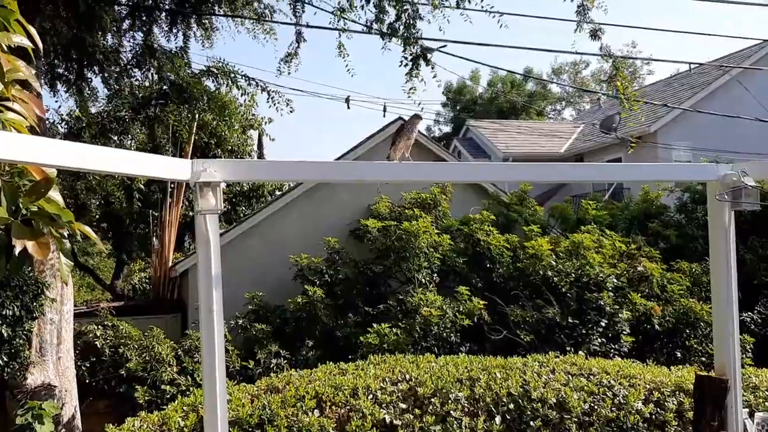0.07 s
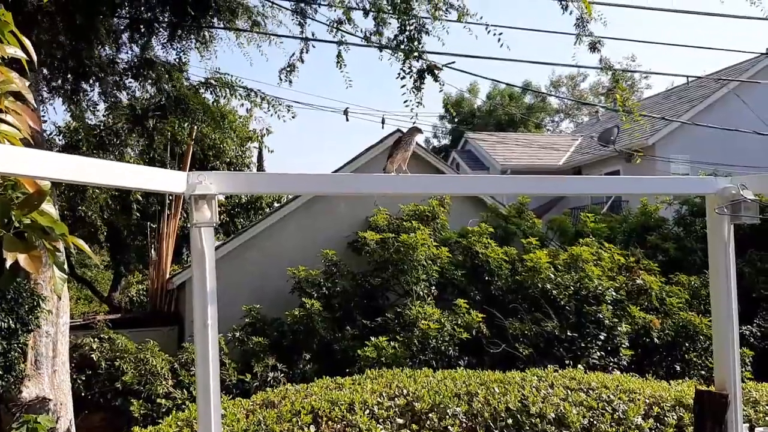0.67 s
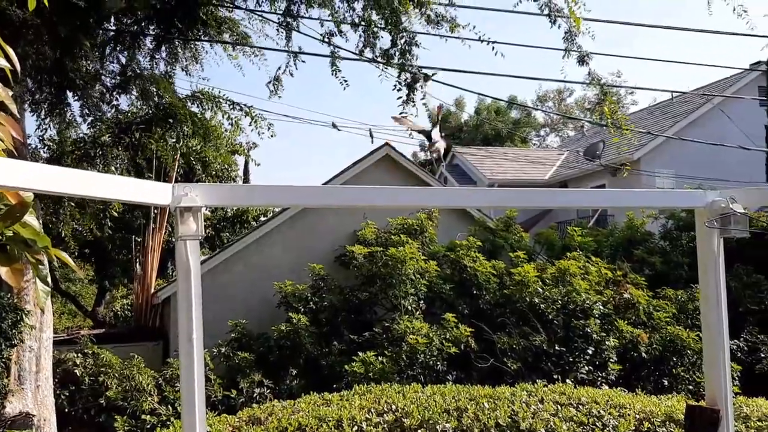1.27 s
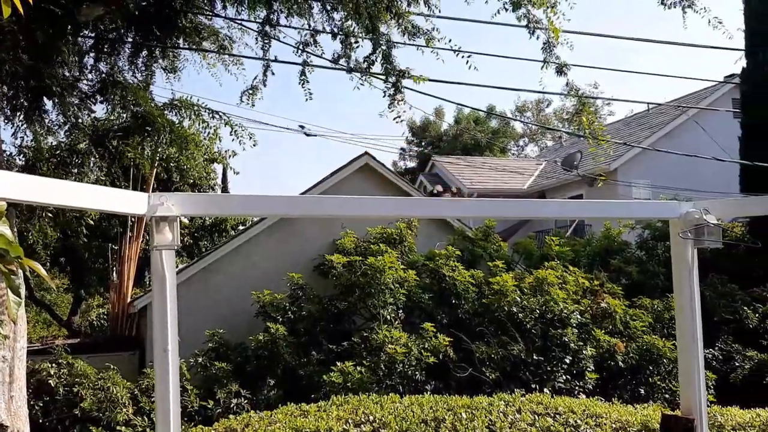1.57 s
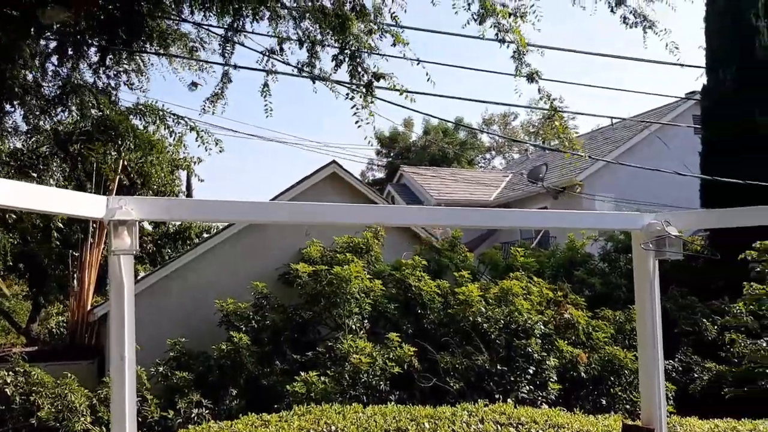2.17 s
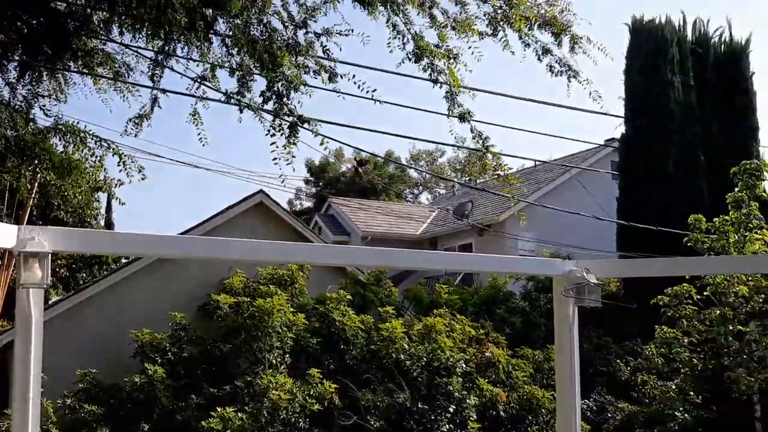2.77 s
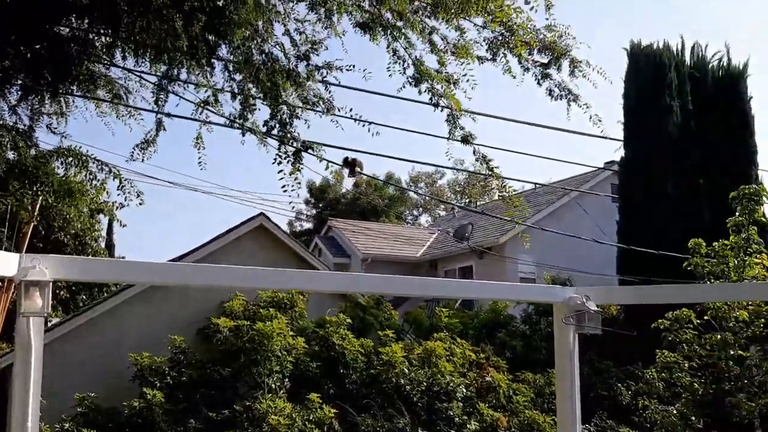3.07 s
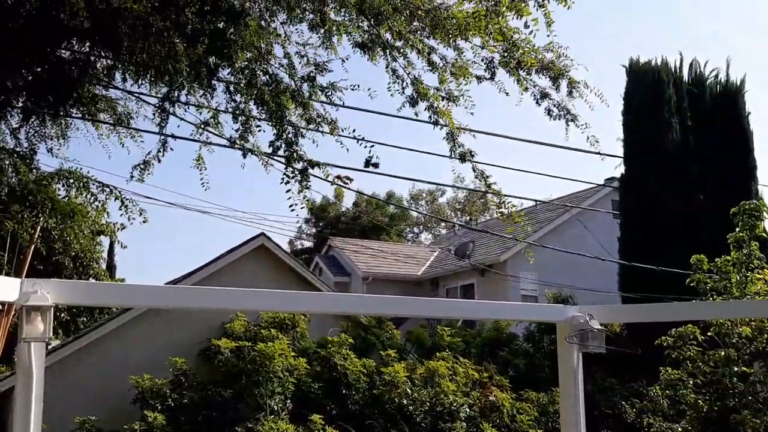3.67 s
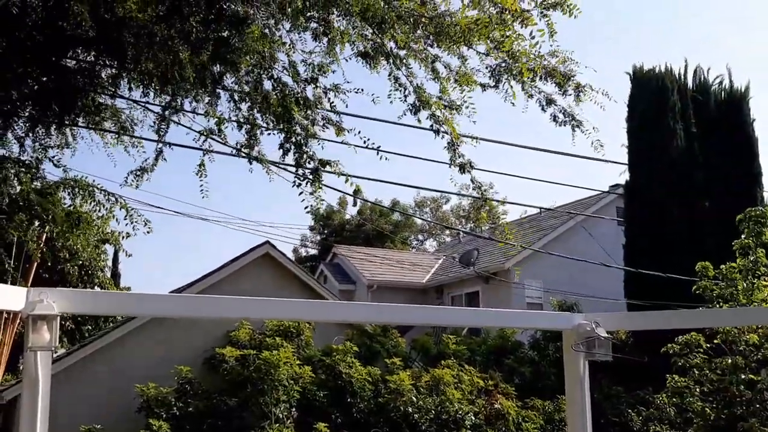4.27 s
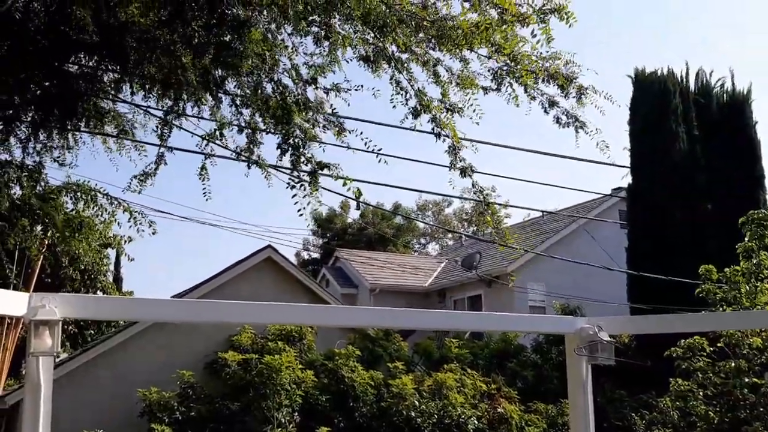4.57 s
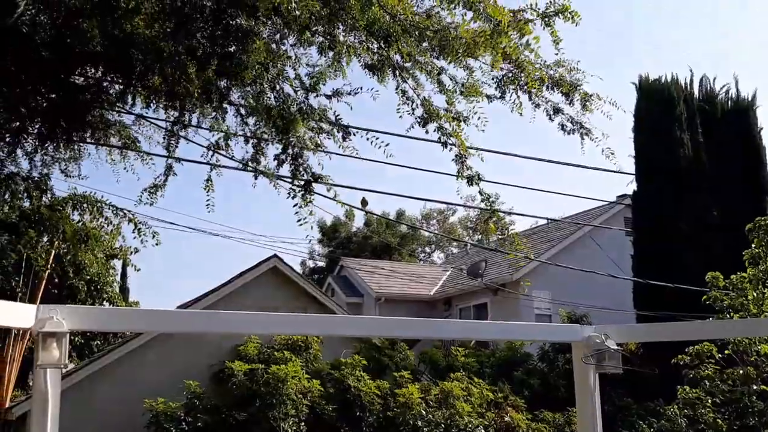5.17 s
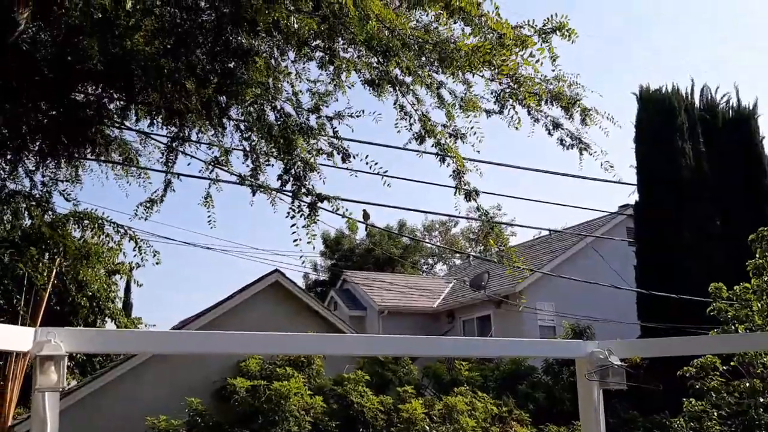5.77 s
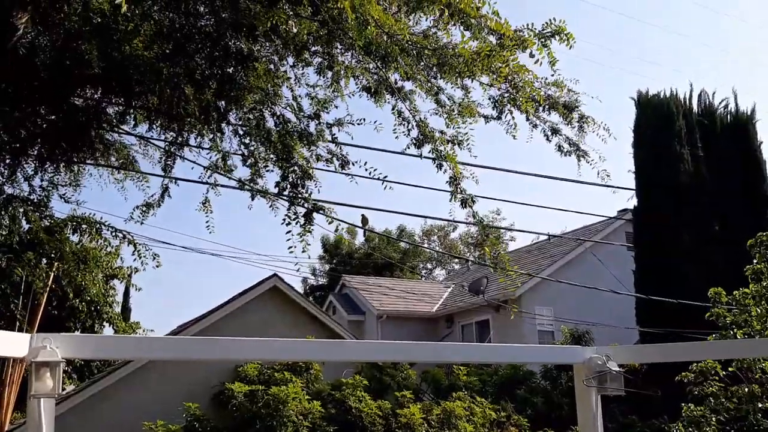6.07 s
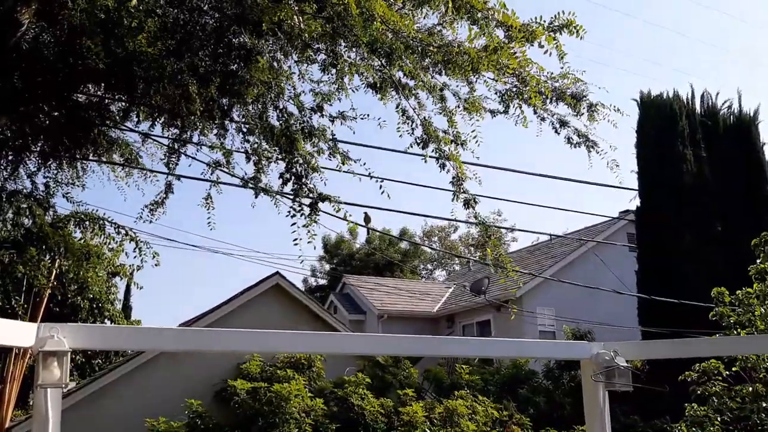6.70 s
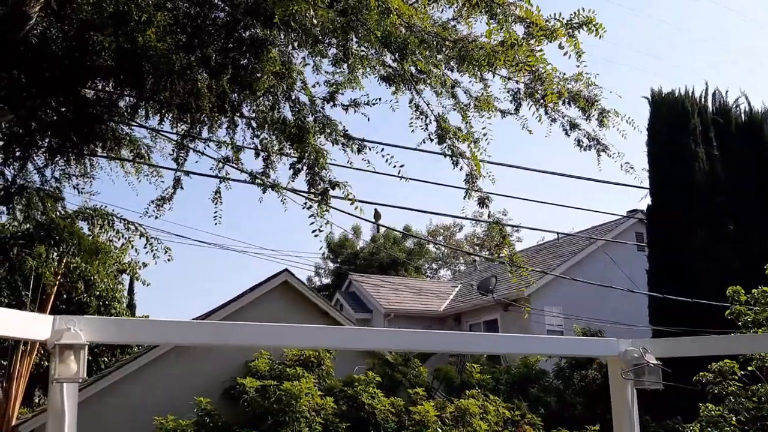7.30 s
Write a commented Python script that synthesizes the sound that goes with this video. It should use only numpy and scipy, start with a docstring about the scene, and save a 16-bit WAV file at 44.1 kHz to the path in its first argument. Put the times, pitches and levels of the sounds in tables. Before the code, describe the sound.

Small birds scold a hawk in a suburban backyard, their calls echoing briefly off house walls over a faint hush and low rumble. Long hissing rasps, thin squeals and cracking yelps fill the first half second, with a soft wing whoosh. Near 0.9 seconds come another whoosh, a slight rustle and hoarse arched chirps. From 1.3 to 2.2 seconds a quick run of rough, high chacks is the loudest part, ending in a chirp. Two more chacks and a squealing rasp follow between 2.5 and 3 seconds. Then it thins to single chirps, faint ticks near 3.6, and lone chacks at 4.1 and 4.6. Rasps return at 4.7 and from 5.6 on, mixed with squeals and lower yelps, growing weaker until about 7.3 seconds. Soft low bumps nudge the hand-held microphone, mostly on the left, at 1.1 seconds and repeatedly from 4 to 7.

```python
"""Songbirds mobbing a hawk in a back yard.

Air forced through the syrinx gives long hissing rasps, squeals, short rough chacks, arched chirps
and cracking yelps. House walls and hedges throw the calls back. Wings whoosh, and soft low bumps
shake the hand-held camera over a faint suburban rumble."""
import sys
import numpy as np
from scipy import signal
from scipy.fft import rfft, irfft, next_fast_len
from scipy.io import wavfile
from scipy.ndimage import map_coordinates

SR = 44100
rng = np.random.default_rng(int(sys.argv[2]) if len(sys.argv) > 2 else 0)


def file_out(sig):
    """Save sig as 16-bit WAV at sys.argv[1]."""
    # one column per channel
    cols = np.atleast_2d(sig).T
    # limit, then scale
    lim = np.clip(cols, -1, 1)
    pcm = np.round(lim * 32767).astype(np.int16)
    wavfile.write(sys.argv[1], SR, pcm)


N = 323694
T = np.arange(N) / SR


def chacks(pulse_hz=165, swing_hz=190, rough_db=8, attack_s=.02, release_s=.035, throat_width_hz=1350):
    """A whistle torn into uneven pulses that jerk pitch and loudness, focused by a throat tuned to it."""
    # Each row: start in seconds, length in seconds, level in dB, pitch in Hz, slide in Hz,
    # left over right in dB.
    calls = [(-.04, 0.079, -33, 3340, 80.5, 3.5), (1.302, 0.13, -26, 3432, -450, -1.5),
             (1.489, 0.096, -25, 3627, 397.5, 1.5), (1.643, .14, -24, 3583, 347.5, 0),
             (1.812, 0.12, -25, 3300, -370, 2), (1.883, .12, -22, 3734, 140.5, 2.5),
             (1.996, 0.077, -30.5, 3420, -250, -0.5), (2.058, .12, -25, 3473, 130, -1),
             (2.458, .14, -28, 3443, -320, 1.5), (2.64, .1, -26, 3747, 261.5, -4),
             (4.111, .12, -29, 3380, -130, 1), (4.587, .12, -30, 3270, -380, 2.5)]
    # Turbulence spectrum. Each row: frequency in Hz, density in dB.
    edge_spectrum = [(800, -13), (1800, -8.5), (2900, 7), (4200, 5.5), (5000, -2), (6400, -7), (7600, -23),
                     (10000, -10), (11700, -6.5), (13500, -13.5), (15500, -16)]
    # Upper throat resonance, rising as the beak opens: early, late.
    beak_hz = (5700, 6420)
    out = np.zeros((2, N))
    for start_s, length_s, db, mid_hz, slide_hz, side_db in calls:
        t = np.arange(int(length_s * SR)) / SR
        n = len(t)
        beat = phase_of(pulse_hz * (1 + .344 * wobble(149.7, n)))
        onset = np.maximum(1 - t / attack_s, 0)
        pitch_hz = mid_hz + slide_hz * (t / length_s - .5) - 300 * onset
        tear = amp(.45 * (db + 26))  # louder calls are torn wider
        pitch_hz += tear * (swing_hz * np.sin(beat) + 150 * wobble(802.2, n))
        phase = phase_of(pitch_hz)
        pulses = amp(rough_db * np.cos(beat) + wobble(200, n) - 24 * onset)
        pulses *= np.clip(np.minimum(t / .004, (length_s - t) / release_s), 0, 1)
        # the second side of the syrinx is lower and less steady
        second_side = amp(-13) * wobble(400, n) * np.sin(phase - 2 * np.pi * 480 * t)
        syrinx = (np.sin(phase) + second_side) * pulses
        tone = unit(filtered(syrinx, lambda hz: resonance(hz, mid_hz, throat_width_hz)))
        undertone = unit(np.sin(phase / 2) * pulses * amp(20 * onset))  # period doubling
        push = pulses * np.sin(np.pi * t / length_s)  # treble needs full pressure
        early, late = (band(np.sin(2 * phase) * push, hz, 500) for hz in beak_hz)
        overtone = unit(early + (late - early) * t / length_s)
        edge = coloured(rng.standard_normal(n) * push, edge_spectrum)
        edge *= amp(-24 + .23 * (db + 37.5))  # louder calls are harsher
        call = amp(db) * (tone + amp(-33.5) * undertone + amp(-29) * overtone + edge)
        add(out, start_s, pan(side_db) * yard(call, walls_db=1, tail_db=2))
    return out


def rasps(attack_s=.029, release_s=.074, fade_db=16.5, low_hz=1540, gape=.07):
    """Air forced through a chaotically fluttering syrinx hisses in three throat resonances."""
    # Each row: start in seconds, length in seconds, relative level in dB, crest in seconds after the
    # start, sag either side in dB/s, low resonance in dB, middle in Hz and dB, high in Hz and dB.
    calls = [(-.25, 0.47, -36, 0.22, 29, 1.5, 2850, 5.5, 5000, 6.5),
             (0.093, 0.48, -36.5, 0.33, 3, 1, 3010, 2.5, 4960, -3),
             (0.959, .27, -43.5, 0.12, 26, 2, 1960, -14.5, 4570, 6.5),
             (2.561, 0.39, -34, .21, 27, -7.5, 2650, -8.5, 5210, 8.5),
             (4.733, .46, -37.5, .04, 27, -6, 3560, 8, 4810, 8),
             (5.611, 0.44, -38, .16, 26, -6.5, 3000, -2.5, 4245, 4),
             (6.078, 0.56, -40.5, 0.23, 27.5, -2.5, 2470, -11.5, 5340, 4.5),
             (6.718, 0.44, -47.5, 0.28, 3, 0, 2430, 1, 5250, 8)]
    # Hiss under the resonances. Each row: frequency in Hz, density in dB.
    hiss = [(150, -6.5), (350, -18.5), (600, -19.5), (950, -8), (1250, -25.5), (1550, -8.5), (2500, 0.5),
            (4500, 6), (6000, 1.5), (7300, -5), (8200, -12), (10000, -19), (12000, -7), (15500, -17.5)]
    out = np.zeros((2, N))
    for start_s, length_s, db, crest_s, sag_db_per_s, low_db, mid_hz, mid_db, high_hz, high_db in calls:
        t = np.arange(int(length_s * SR)) / SR
        n = len(t)
        flutter = amp(1.5 * wobble(700, n) + 1.32 * wobble(90, n))
        modes = [(low_hz, 340, low_db), (mid_hz, 520, mid_db), (high_hz, 650, high_db)]
        treble = [(5000, 0), (9000, .35 * (db + 40.5))]  # louder calls are brighter

        def throat(hz):
            peaks = sum(amp(gain) * resonance(hz, centre, width) ** 2 for centre, width, gain in modes)
            return amp(along(hiss, hz) + along(treble, hz)) + peaks

        voice = filtered(flutter * rng.standard_normal(n), throat)
        # the beak opens and closes: all resonances rise and sink together
        rise = gape * (np.sin(np.linspace(0, np.pi, n)) - 2 / np.pi) + .012 * wobble(25, n)
        voice = unit(map_coordinates(voice, [np.cumsum(1 + rise)], order=5, mode="mirror"))
        opened = np.clip(np.minimum(t / attack_s, (length_s - t) / release_s), 0, 1)
        push_db = db + 5 - sag_db_per_s * np.abs(t - crest_s) - fade_db * (1 - opened)
        voice *= amp(push_db) * signal.windows.tukey(n, .04)
        add(out, start_s, pan(-.4) * yard(voice, walls_db=4, tail_db=-5))
    return out


def squeals(jitter=.0246, rough_db=5.7):
    """Within a rasp the fluttering syrinx briefly locks onto one shaky, sliding pitch."""
    # Each row: start in seconds, length in seconds, opening pitch in Hz, closing pitch in Hz, level in dB.
    calls = [(.11, .2, 5050, 4600, -40), (.37, .19, 5000, 4900, -38.5), (2.73, .06, 2650, 2450, -38),
             (2.825, .095, 2530, 2300, -38.5), (2.78, 0.158, 1780, 1560, -52),
             (5.615, .055, 2550, 2400, -42), (5.655, 0.094, 1950, 1430, -46), (5.65, .11, 3700, 2750, -40),
             (6.33, 0.2, 2760, 2560, -47.5)]
    out = np.zeros((2, N))
    for start_s, length_s, open_hz, close_hz, db in calls:
        n = int(length_s * SR)
        pitch_hz = np.geomspace(open_hz, close_hz, n) * (1 + jitter * wobble(900, n))
        swell = amp(rough_db * wobble(250, n)) * signal.windows.tukey(n, .5)
        tone = unit(swell * np.sin(phase_of(pitch_hz)))
        add(out, start_s, yard(amp(db) * tone, walls_db=2, tail_db=-9.5))
    return out


def chirps(top_at=.41, droop=1.25):
    """Whistles that arch up and down in pitch."""
    # Each row: start in seconds, length in seconds, top pitch in Hz, level in dB,
    # relative overtone level in dB, hoarseness from 0 to 1.
    calls = [(.862, 0.056, 2785, -40.5, -26, 0.64), (.912, 0.06, 3135, -43.5, -20, 0.98),
             (1.008, 0.092, 2534, -31.5, -14, 0.21), (1.292, .135, 2450, -33, 3, 0.42),
             (2.184, .1, 2807, -28.5, -10, .42), (3.095, 0.11, 2519, -38, -10, .45),
             (3.47, 0.1, 2523, -40.5, -12, .25), (5.086, .11, 2196, -38.5, -10, .55)]
    return whistles(calls, lambda u: 1 - droop * (u - top_at) ** 2)


def yelps(break_at=.37, jump_share=.05, fall_at=.78):
    """Lower whistles that climb, crack up to the top pitch, hold and fall."""
    # Each row: start in seconds, length in seconds, top pitch in Hz, level in dB,
    # relative overtone level in dB, hoarseness from 0 to 1.
    calls = [(.11, .14, 1893, -41, -10, .51), (.34, .14, 1828, -37, 2, 0.41),
             (.445, .125, 2092, -38.5, -9, .55), (5.835, .13, 1995, -37.5, -9, .45),
             (6.037, .12, 1985, -39, -11, 0.44), (6.686, .16, 1872, -44.5, 1, .5),
             (7.2, .14, 1987, -40, -2, .5)]

    def crack(u):
        low = .72 + .2793 * u
        high = np.interp(u, [fall_at, 1], [1, .7])
        return low + (high - low) * np.clip((u - break_at) / jump_share, 0, 1)

    return whistles(calls, crack)


def whistles(calls, shape, waver=.063, rough_db=8, trill_hz=130, db_per_octave=25.5, attack_s=.025):
    """A shaky whistle follows its shape; the overtone stands out as it passes the throat resonance."""
    out = np.zeros((2, N))
    for start_s, length_s, top_hz, db, overtone_db, hoarseness in calls:
        n = int(length_s * SR)
        u = np.linspace(0, 1, n)
        glide = shape(u)  # share of the top pitch
        fray = hoarseness * (1 + 1.1 * (u - .5))
        onset = np.maximum(1 - u * length_s / attack_s, 0)
        level_db = db_per_octave * np.log2(glide) - 9 * onset
        trill = np.sin(phase_of(trill_hz * (1 + .3 * wobble(100, n))))
        shake = fray * waver * (wobble(700, n) + .31 * trill)
        phase = phase_of(top_hz * (glide + shake))
        flutter_db = fray * rough_db * (wobble(220, n) + .5 * trill)
        swell = amp(level_db + flutter_db) * signal.windows.tukey(n, .1)
        overtone = filtered(swell * np.sin(2 * phase), lambda hz: resonance(hz, 2940, 320) ** 2 + amp(-28))
        husk = amp(-12.5) * fray * band(rng.standard_normal(n), .98 * top_hz, 900)
        call = unit(swell * (np.sin(phase) + husk) + amp(overtone_db + 7) * overtone)
        add(out, start_s, yard(amp(db) * call, walls_db=2.5, tail_db=-2.5))
    return out


def wings():
    """Wings push air aside in soft whooshes."""
    # Each row: centre in seconds, width in seconds, level in dB.
    strokes = [(.04, 0.15, -50.5), (.865, 0.035, -46), (.93, 0.079, -52.5), (4.93, 0.084, -61)]
    # Each row: frequency in Hz, density in dB.
    whoosh = [(100, -10), (280, 2), (480, 4.5), (750, -3), (1100, -15), (2500, -16.5), (6000, -63)]
    swell = sum(amp(db) * gaussian(centre_s, width_s) for centre_s, width_s, db in strokes)
    return swell * noise(whoosh, alike=.69)


def rustles(width_hz=2200):
    """Brief scratchy swells of flickering noise."""
    # Each row: centre in seconds, width in seconds, level in dB, band centre in Hz.
    swells = [(0.844, 0.012, -52, 3160), (.92, 0.046, -62.5, 3020), (3.872, 0.05, -56.5, 4790)]
    out = np.zeros((2, N))
    for centre_s, width_s, db, centre_hz in swells:
        scratch = band(rng.standard_normal((2, N)), centre_hz, width_hz)
        out += amp(db + 1.1 * wobble(120, N)) * scratch * gaussian(centre_s, width_s)
    return out


def ticks(decay_s=.0016):
    """Faint sharp ticks echo in the yard."""
    # Each row: start in seconds, relative level in dB.
    hits = [(3.565, -43), (3.692, -54), (5.322, -48.5)]
    out = np.zeros((2, N))
    t = np.arange(SR // 20) / SR
    for start_s, db in hits:
        burst = rng.standard_normal(len(t)) * np.exp(-t / decay_s)
        tick = filtered(burst, lambda hz: resonance(hz, 2700, 6000))
        add(out, start_s, yard(amp(db) * tick, walls_db=3.5, tail_db=-.5))
    return out


def bumps(thud_hz=77.2, decay_s=.011):
    """The hand nudges the camera: a heavily damped low swing with a scuff."""
    # Each row: start in seconds, relative level in dB.
    nudges = [(1.102, -26), (3.982, -31), (4.247, -32.5), (4.717, -35.5), (5.49, -37.5), (5.946, -32),
              (6.258, -36), (6.469, -34.5), (6.598, -34.5), (6.868, -29.5)]
    out = np.zeros((2, N))
    t = np.arange(SR // 6) / SR
    swing = np.sin(2 * np.pi * thud_hz * t) * np.exp(-t / decay_s)
    scuff_envelope = .47 * np.exp(-t / .019) * (1 - np.exp(-t / .0042))
    for start_s, db in nudges:
        scuff = scuff_envelope * band(rng.standard_normal((2, len(t))), 87, 73)
        add(out, start_s, amp(db - 1) * pan(-17) * (swing + scuff))
    return out


def rumble():
    """A faint, uneven low rumble."""
    # Each row: time in seconds, relative level in dB.
    levels = [(0.0, -57.5), (0.88, -60.5), (1.24, -55.5), (3.35, -66.5), (4.17, -54.5), (4.52, -63),
              (4.91, -55.5), (5.44, -59.5), (5.68, -50), (6.75, -55.5), (7.34, -48.5)]
    # Each row: frequency in Hz, density in dB.
    spectrum = [(15, -15.5), (30, -10), (48, -0.5), (75, 1), (110, -4.5), (180, -14.5), (290, -22),
                (450, -51.5), (900, -86)]
    level_db = np.interp(T, *np.transpose(levels)) + 5 + 2.8 * wobble(18, N)
    return amp(level_db) * noise(spectrum, alike=.2) * pan(-1.5)


def air(level_db=-60):
    """The near-steady hush of the neighbourhood."""
    # Each row: frequency in Hz, density in dB.
    spectrum = [(100, 1.5), (250, -2.5), (450, -11), (1000, -10), (2000, -17.5), (4000, -20), (7000, -33.5),
                (10000, -38.5), (15500, -23.5)]
    return amp(level_db + .4 * wobble(2.5, N)) * noise(spectrum, alike=.33)


def yard(call, walls_db, tail_db, spread_s=.02, echo_s=.046, echo_db=-8, reflections=14):
    """Direct path, near walls, a house echo and a diffuse tail, at unchanged energy."""
    # Each row: frequency in Hz, time to fall 60 dB in seconds.
    t60 = [(300, 0.57), (2300, 0.4), (3600, 0.35), (6000, 0.49), (14000, 0.5)]
    hz, t, bins = signal.stft(rng.standard_normal((2, SR // 2)), SR, nperseg=256)
    decay = amp(-60 * t / along(t60, hz)[:, None])
    tail = signal.istft(bins * decay, SR, nperseg=256)[1]
    paths = amp(tail_db) * tail / np.linalg.norm(tail[0])
    for ear in paths:
        delay_s = np.minimum(rng.exponential(spread_s, reflections), .2)
        strength = rng.standard_normal(reflections) * np.exp(-delay_s / (2 * spread_s))
        ear[(delay_s * SR).astype(int)] += amp(walls_db) * strength / np.linalg.norm(strength)
        ear[int(echo_s * rng.uniform(.9, 1.1) * SR)] += amp(echo_db)
        ear[int(rng.uniform(0, .0003) * SR)] += 1  # bearing decides which side hears it first
    heard = signal.fftconvolve(call[None], paths, axes=1)
    return heard * np.linalg.norm(call) / np.linalg.norm(heard, axis=1, keepdims=True)


def amp(db):
    """Decibels to gain."""
    return 10 ** (np.asarray(db) / 20)


def unit(x):
    """Scale to rms 1."""
    return x / np.sqrt(np.mean(x ** 2) + 1e-20)


def along(points, hz):
    """(Hz, value) points read on a log axis."""
    knots_hz, values = np.transpose(points)
    return np.interp(np.log(hz + 1), np.log(knots_hz + 1), values)


def phase_of(hz):
    """Running phase in radians."""
    return 2 * np.pi * np.cumsum(hz) / SR


def gaussian(centre_s, width_s):
    """Bell-shaped envelope, peak 1."""
    return np.exp(-((T - centre_s) / width_s) ** 2 / 2)


def wobble(rate_hz, n):
    """A smooth curve through random knots."""
    knots = rng.standard_normal(int(n * rate_hz / SR) + 4)
    return map_coordinates(knots, [np.arange(n) * rate_hz / SR + 1])


def filtered(x, response):
    """Apply a frequency response."""
    n = x.shape[-1]
    padded = next_fast_len(n + 8192)
    return irfft(rfft(x, padded) * response(np.fft.rfftfreq(padded, 1 / SR)), padded)[..., :n]


def resonance(hz, centre_hz, width_hz):
    """Gain of one resonance, 1 at its centre."""
    return hz * width_hz / np.hypot(centre_hz ** 2 - hz ** 2, hz * width_hz)


def band(x, centre_hz, width_hz):
    """Filter by a squared resonance, to rms 1."""
    return unit(filtered(x, lambda hz: resonance(hz, centre_hz, width_hz) ** 2))


def coloured(x, spectrum):
    """Filter by (Hz, dB) points, to rms 1."""
    return unit(filtered(x, lambda hz: amp(along(spectrum, hz))))


def noise(spectrum, alike):
    """Coloured stereo noise with a share common to both sides."""
    white = np.sqrt(alike) * rng.standard_normal(N) + np.sqrt(1 - alike) * rng.standard_normal((2, N))
    return coloured(white, spectrum)


def pan(db):
    """Left and right gains for a level difference."""
    return amp([[db / 2], [-db / 2]])


def add(track, start_s, x):
    """Mix x into the track."""
    start = round(start_s * SR)
    track[:, max(start, 0):start + x.shape[-1]] += x[..., max(-start, 0):N - start]


def scene():
    """The birds over the quiet neighbourhood."""
    hush = air()
    birds = rasps() + squeals() + chacks() + chirps() + yelps()
    return birds + wings() + rustles() + ticks() + rumble() + bumps() + hush


def record(dry, low_cut_hz=38, top_hz=15750):
    """The microphone ports notch the treble, the left is duller; deep bass and the very top are cut."""
    # Each row: frequency in Hz, gain in dB.
    notch = [(7600, -0.5), (8200, -11), (8650, -31), (9300, -13), (10300, -3)]
    # Unequal ports. Each row: frequency in Hz, left over right in dB.
    tilt = [(2500, -1.5), (4500, 0.5), (6500, -5), (9000, -12), (14000, -3.5)]
    sides = lambda hz: amp(along(tilt, hz) * np.array([[.5], [-.5]]))
    low_cut = lambda hz: hz ** 3 / np.hypot(hz ** 3, low_cut_hz ** 3)
    return filtered(dry, lambda hz: amp(along(notch, hz)) * sides(hz) * low_cut(hz) * (hz < top_hz))


dry = scene()
out = record(dry)
file_out(out)
```